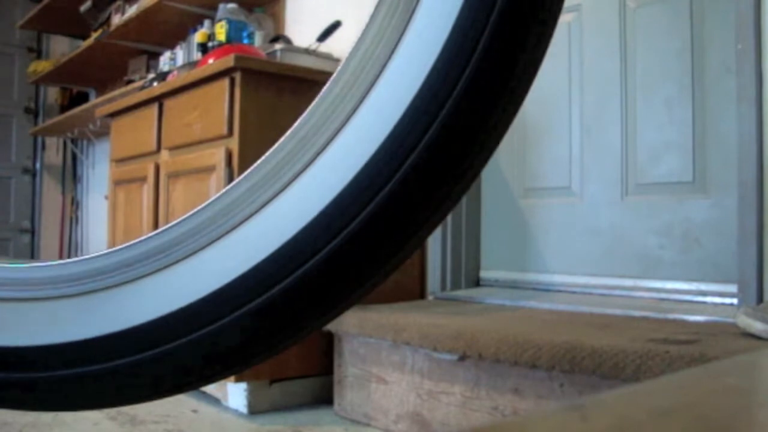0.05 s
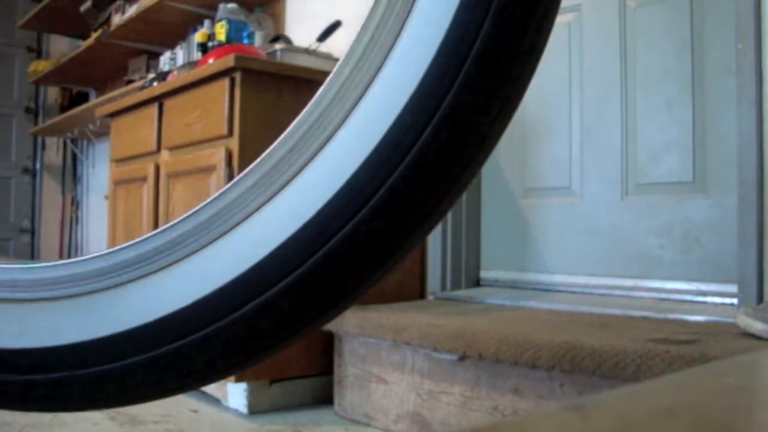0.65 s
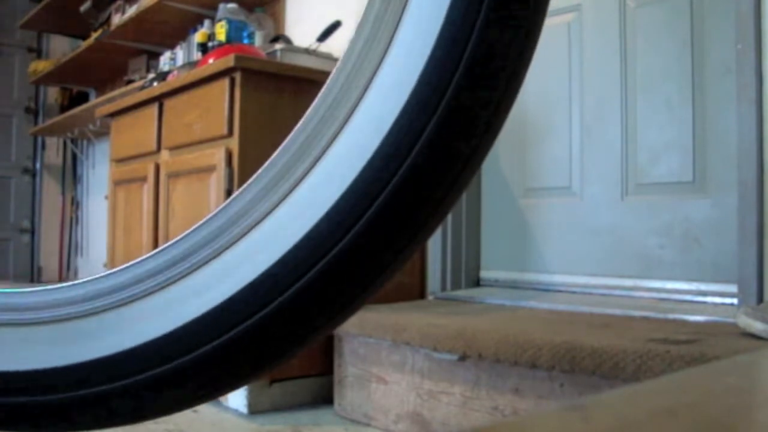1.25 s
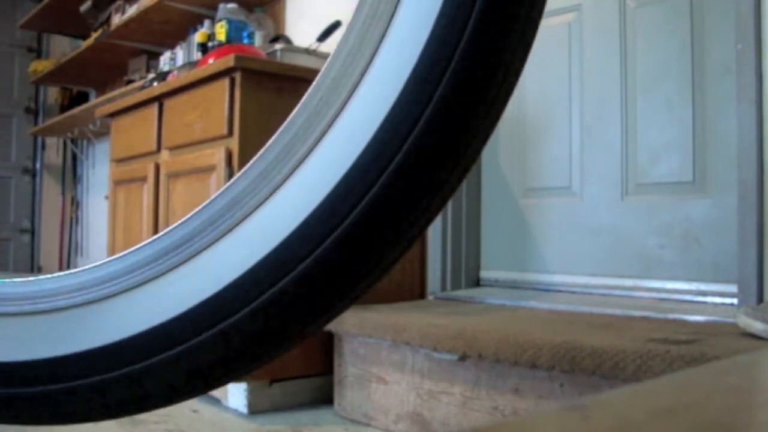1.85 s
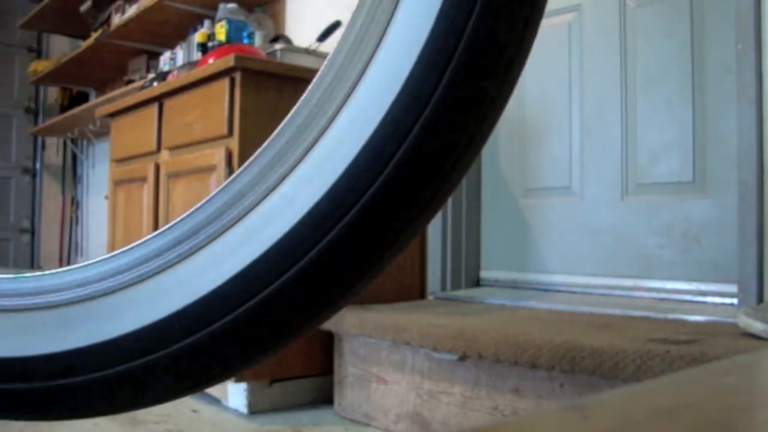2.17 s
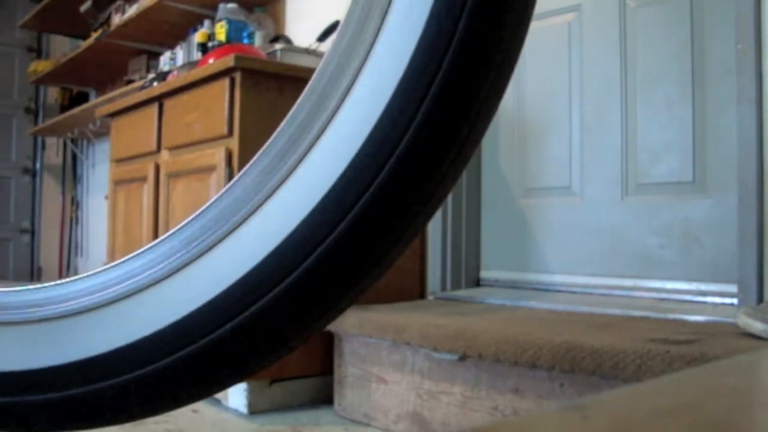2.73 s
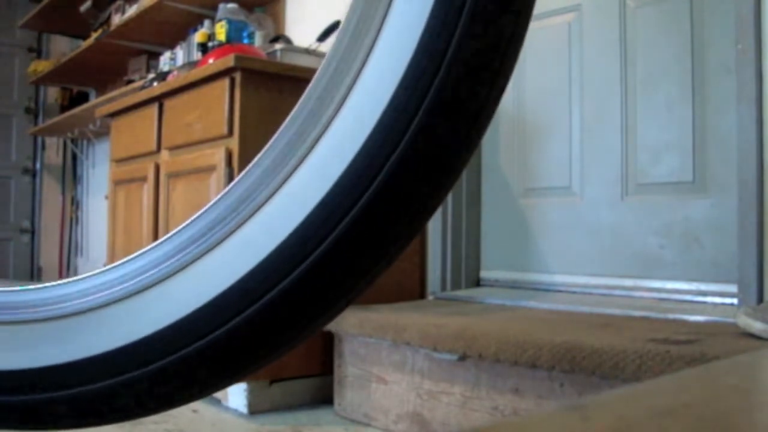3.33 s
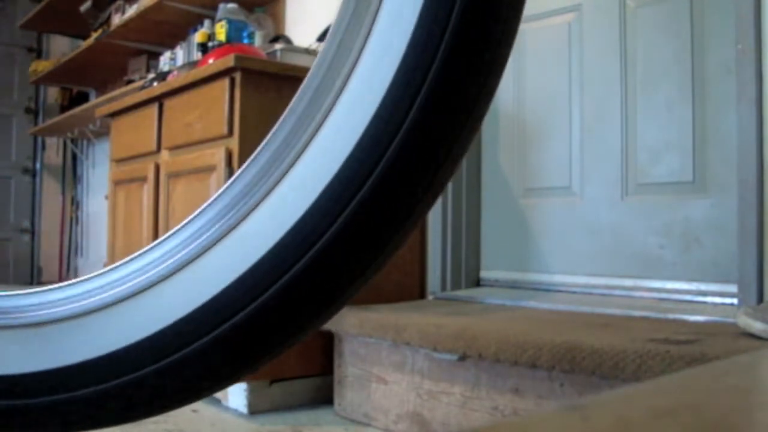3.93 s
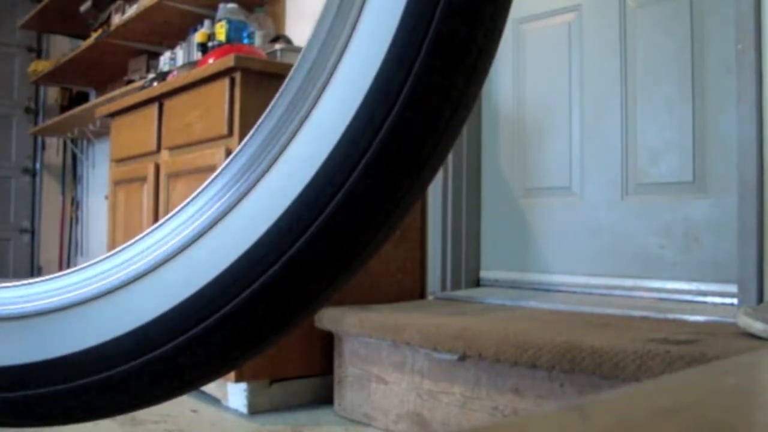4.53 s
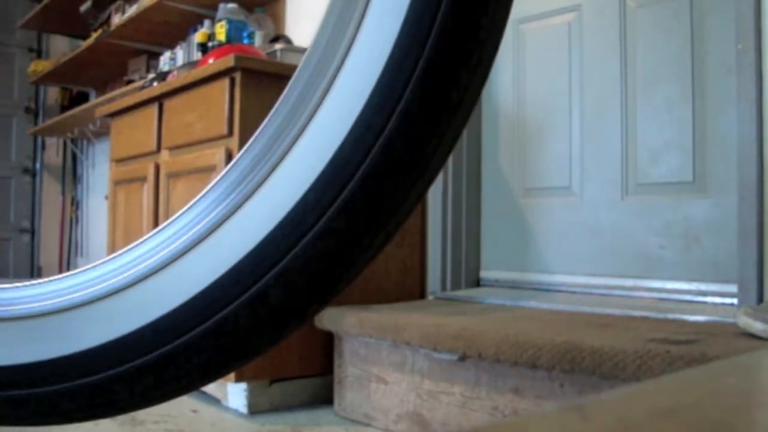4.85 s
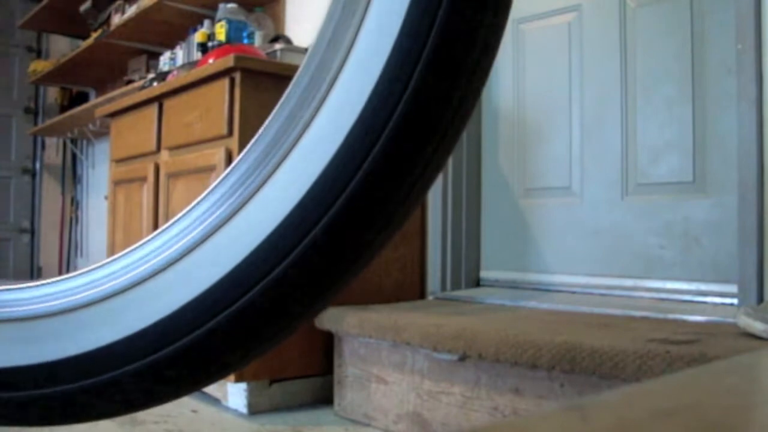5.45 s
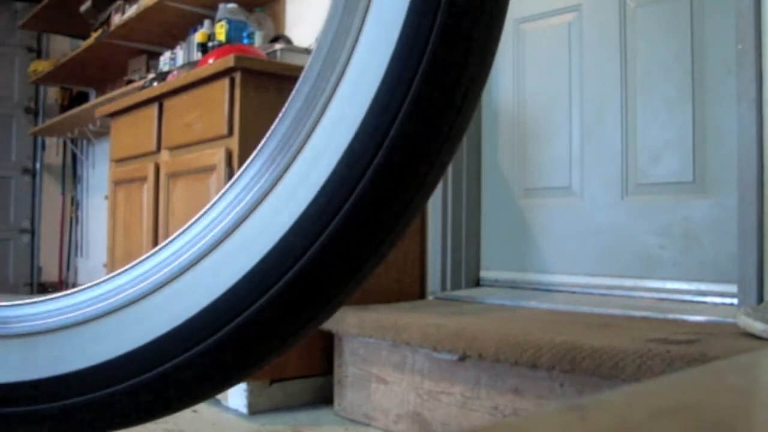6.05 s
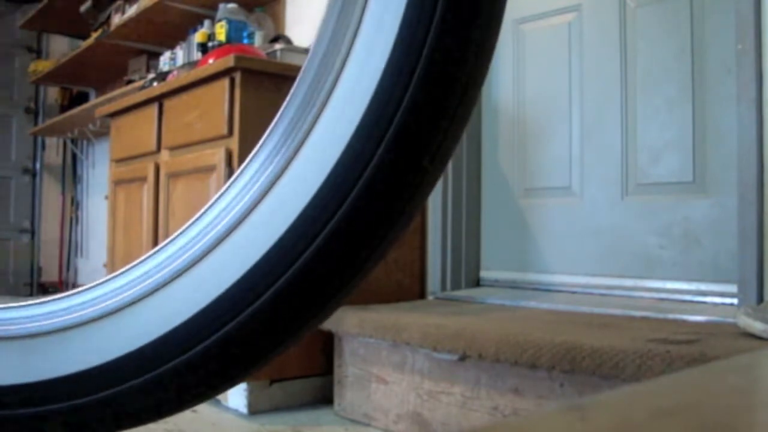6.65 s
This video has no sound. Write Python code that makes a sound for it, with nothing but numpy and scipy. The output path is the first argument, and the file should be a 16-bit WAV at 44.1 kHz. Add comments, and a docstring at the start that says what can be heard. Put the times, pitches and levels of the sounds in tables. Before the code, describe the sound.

From 0 seconds, a bicycle's rear wheel is already spinning freely close to the microphone. The ratchet in its hub makes tiny, sharp steel clicks, about fifty-five a second at first, so they run together into a high, bright buzz. Each click carries a thin metallic ring from the hub, spokes and rim, with faint high pings scattered through it. The clicks are slightly uneven, and the buzz throbs gently about twice a second as the wheel turns. From the first second or so onward, the wheel steadily loses speed: the click rate eases down, the buzz grows a little coarser and slightly softer, and the throb slows with it. The clicking continues unbroken to the end. The garage adds a light echo, about a second long, and a very faint, steady hush of room air lies underneath.

```python
"""A freewheeling bicycle wheel

A rear wheel spins freely in a garage and slowly loses speed, its ratchet buzzing.
Two steel pawls (small catches) scrape up each of 24 teeth and snap down, ringing the hub,
the spokes and the rim. The ringing parts turn past a near microphone, and the garage echoes."""
import sys
import numpy as np
from scipy import signal
from scipy.fft import rfft, irfft, next_fast_len
from scipy.io import wavfile

SR = 44100
rng = np.random.default_rng(int(sys.argv[2]) if len(sys.argv) > 2 else 0)


def log_audio(samples):
    """Write samples as a 16-bit WAV file to the path given in sys.argv[1]."""
    # one column per channel
    frames = np.atleast_2d(samples).T
    # limit to full scale, then quantise
    limited = np.clip(frames, -1, 1)
    pcm = np.round(limited * 32767).astype(np.int16)
    wavfile.write(sys.argv[1], SR, pcm)


N = 295029


def amp(db):
    """Turn decibels into a gain."""
    return 10 ** (np.asarray(db) / 20)


def coloured(x, spectrum):
    """Shape the tone of x with a curve through (pitch [Hz], level [dB]) points."""
    hz, db = np.transpose(spectrum)
    bins_hz = np.fft.rfftfreq(len(x), 1 / SR)
    curve_db = np.interp(np.log(bins_hz + 1), np.log(hz), db)
    return irfft(rfft(x) * amp(curve_db), len(x))


def noise(spectrum, size):
    """Noise with the given tone, at an average (rms) level of 1."""
    x = coloured(rng.standard_normal(next_fast_len(size)), spectrum)[:size]
    return x / np.std(x)


def pulses(times, sizes):
    """A row of sharp clicks, which may fall between samples."""
    at = times[:, None] * SR
    taps = np.floor(at).astype(int) + np.arange(-7, 9)
    shape = np.sinc(taps - at) * np.sinc((taps - at) / 8)
    inside = (taps >= 0) & (taps < N)
    return np.bincount(taps[inside], (sizes[:, None] * shape)[inside], N)


def ring(x, response):
    """Let every click in x set off the given ringing sound."""
    return signal.oaconvolve(x, response)[:N]


def tone(hz, peak_s, order=3):
    """One ringing tone that swells to its peak and dies away."""
    t = np.arange(SR // 10) / SR
    age = t / peak_s
    return (age * np.exp(1 - age)) ** order * np.sin(2 * np.pi * hz * t)


def dense_ring(spectrum, rise_s, fade_s):
    """Countless tones fading together, by 60 dB in fade_s; the deep bass is filtered out."""
    t = np.arange(SR // 2) / SR
    tail = noise(spectrum, size=len(t)) * (1 - np.exp(-t / rise_s)) * amp(-60 * t / fade_s)
    tail = signal.sosfilt(signal.butter(3, 140, "high", fs=SR, output="sos"), tail[t < fade_s])
    return tail / np.linalg.norm(tail)


def turning(blows, turn, spectrum, rise_s, fade_s, angles):
    """The ringing changes as the wheel turns: each angle's sound fades into the next."""
    out = np.zeros(N)
    for k in range(angles):
        away = np.abs((turn * angles - k + angles / 2) % angles - angles / 2)
        share = np.cos(np.minimum(away, 1) * np.pi / 2)
        out += ring(blows * share, dense_ring(spectrum, rise_s, fade_s))
    return out


def passing(blows, turn, tones, order):
    """Each tone swells once a turn, as its loudest part passes the microphone."""
    out = np.zeros(N)
    for hz, peak_s, db, swing_db, facing in tones:
        gain = amp(db + swing_db * np.cos(2 * np.pi * (turn - facing)))
        out += ring(blows * gain, tone(hz, peak_s, order))
    return out


# The hush of the room: (pitch [Hz], relative level [dB])
AIR_SPECTRUM = [(20, -0.5), (45, -34.5), (66, -9), (80, 7), (95, -3), (120, 3.5), (160, 0.5), (260, 7),
                (700, 8.5), (3000, 7), (10000, -21.5)]

def still_air():
    """The air in the garage makes a faint, steady hush."""
    return amp(-60) * noise(AIR_SPECTRUM, size=N)


# The tone of the echo: (pitch [Hz], relative level [dB])
ECHO_SPECTRUM = [(170, -34), (270, -20.5), (800, -16), (1650, -8.5), (2050, -1.5), (2650, 0), (3100, 4.5),
                 (3800, 6), (4400, 5), (4900, 7.5), (5800, -12.5), (6500, -30), (7700, -16), (10000, -50)]

def garage_echo(blows, turn):
    """The garage answers each click with a wash of echoes."""
    return amp(-15) * turning(blows, turn, ECHO_SPECTRUM, rise_s=0.00063, fade_s=1.0, angles=6)


# The rim's tones, with two steady tones of the garage near 2.9 kHz (2853 and 2930 Hz): # (pitch [Hz], time to
# peak [s], relative level [dB], swing each way [dB], swing angle [turns])
RIM_TONES = [(572, 0.0068, -43.5, 2.5, 0.3), (941, 0.018, -46.5, 1.5, 0.95), (1053, 0.0039, -43, 8.5, 0.9),
             (1253, 0.0056, -41.5, 2.5, 0.9), (1389, 0.0055, -29.5, 3, 0.51), (1973, 0.0089, -38, 13.5, 0),
             (2448, 0.014, -40.5, 9, 0.48), (2853, 0.011, -25.5, 2, 0.5), (2930, 0.058, -42.5, 10.5, 0.2),
             (3130, 0.011, -33, 8, 0.14), (3720, 0.0078, -40, 13, 1)]

def rim(blows, turn):
    """Blows travel through the spokes, so the rim's tones swell more slowly; two steady garage tones ring
    along."""
    return amp(-21) * passing(blows, turn, RIM_TONES, order=3)


# The ring of spokes and frame: (pitch [Hz], relative level [dB])
SPOKE_SPECTRUM = [(80, -55.5), (270, -29.5), (520, -31.5), (780, -30), (1200, -14.5), (1650, -26),
                  (2000, -13), (2650, -13.5), (3100, 6), (3550, 6), (4050, 7), (4400, -2.5), (5050, 5),
                  (5800, -1), (7000, -34.5)]

def spokes(blows, turn):
    """Spokes and frame ring with many tones at once."""
    return amp(-13) * turning(blows, turn, SPOKE_SPECTRUM, rise_s=0.0003, fade_s=0.084, angles=12)


# The flanges' tones:
# (pitch [Hz], time to peak [s], relative level [dB], swing each way [dB], swing angle [turns])
FLANGE_TONES = [(3453, 0.0019, 4, 2.5, 0.77), (3930, 0.00078, -2, -0.5, 0.1), (4854, 0.00096, 3, 0.5, 0.49)]

def flanges(blows, turn):
    """The flanges, the hub's collars that hold the spokes, ring right away."""
    return amp(-40.5) * passing(blows, turn, FLANGE_TONES, order=2)


# The ring of the hub's shell: (pitch [Hz], relative level [dB])
HUB_SPECTRUM = [(2500, -31.5), (4400, -12), (5000, -18), (6100, -72), (6750, 12.5), (7100, -18.5),
                (7450, 17.5), (7780, 16), (8150, -28), (8700, 14), (9200, -9), (10000, -2.5)]

def hub(snaps, turn):
    """Each snap makes the hub's shell ring, short and bright."""
    return amp(-9.5) * turning(snaps, turn, HUB_SPECTRUM, rise_s=0.0015, fade_s=0.011, angles=12)


# Faint high pings: (pitch [Hz], relative level [dB])
PING_TONES = [(7350, 9.5), (7800, 7), (8350, 0), (8850, -8), (9500, -6)]

def pings(times, sizes, chance=0.21, earliest_s=0.001, spread_s=0.0082):
    """Now and then a high tone flares briefly after a click."""
    out = np.zeros(N)
    for hz, db in PING_TONES:
        luck, late = rng.random((len(times), 2)).T
        strength = np.sqrt(np.maximum(1 - luck / chance, 0))
        starts = pulses(times + earliest_s + spread_s * late, sizes * strength)
        out += amp(db) * ring(starts, tone(hz, peak_s=0.0031, order=4))
    return amp(-35.5) * out


def scrape(times, sizes, length_s=0.002):
    """Just before it falls, the pawl grates over the tip of the tooth."""
    t = np.arange(N) / SR
    coming = np.minimum(np.searchsorted(times, t), len(times) - 1)
    swell = np.exp(-((times[coming] - t) / length_s) ** 4)
    return amp(-22.5) * sizes[coming] * swell * rng.standard_normal(N)


def pawl_strokes(times, sizes, lag_s=0.0011, bounce_s=0.0022, mean_loss_db=5.2, count=3):
    """At each tooth one pawl snaps down, the other follows, and weaker bounces come after."""
    luck = rng.random((len(times), count, 2))
    strokes = pulses(times, sizes)
    for k in range(count):
        times = times + (bounce_s if k else lag_s) * (0.5 + luck[:, k, 0])
        sizes = sizes * amp(-2 * mean_loss_db * luck[:, k, 1])
        strokes += pulses(times, sizes)
    return strokes


# A pawl's own tones: (pitch [Hz], time to peak [s], relative level [dB])
PAWL_TONES = [(7655, 0.00057, -1), (9300, 0.00063, -7), (7190, 0.00021, 4), (10900, 0.00012, -22.5)]

def pawls(snaps):
    """The small steel pawls ring with a very short, high tick."""
    tick = sum(amp(db) * tone(hz, peak_s) for hz, peak_s, db in PAWL_TONES)
    return amp(-22.5) * ring(snaps, tick)


TOOTH_COUNT = 24
# Teeth that stand out: (tooth [number], change in snap [dB], change in blow to the wheel [dB])
UNEVEN_TEETH = [(0, -2.8, 1.8), (5, -2, -1.8), (6, 2.3, -2.3), (9, .3, 1.7), (11, -1.8, -1.7),
                (15, 1.7, 2.8), (18, .5, 4.2)]

def tooth_wear_db(usual_wear_db=1):
    """Every tooth is a little worn and a few stand out, so each has its own snap and blow."""
    wear = usual_wear_db * rng.standard_normal((TOOTH_COUNT, 2))
    for number, snap_db, blow_db in UNEVEN_TEETH:
        wear[number] = snap_db, blow_db
    return wear


def force_db(times, turn):
    """The pawls fall softer over time, and unevenly: the ratchet is off centre and slightly oval."""
    fading = -2.33 - 0.1846 * times
    swing_db = -0.3 + 0.22 * times  # passes through zero, then grows as the wheel slows
    off_centre = swing_db * np.cos(2 * np.pi * (turn - 0.5))
    oval = 0.5 * np.cos(2 * np.pi * 2 * (turn - 0.23))
    return fading + off_centre + oval


def coasting(t, start_teeth_per_s=55.619, slowing_per_s=2.2486, easing_s=36.9):
    """Teeth passed per second: bearings and air brake the wheel, a little less as it slows."""
    return start_teeth_per_s - slowing_per_s * easing_s * (1 - np.exp(-t / easing_s))


def freewheel():
    """The pawls drop off tooth after tooth, ringing the whole wheel and filling the garage."""
    t = np.arange(N) / SR
    speed = coasting(t)
    teeth_passed = np.cumsum(speed) / SR - 0.27  # starts just short of the first tip
    turn = teeth_passed / TOOTH_COUNT
    tooth = np.arange(int(teeth_passed[-1]) + 1)
    time_jitter, force_jitter, squareness = rng.standard_normal((len(tooth), 3)).T
    times = np.interp(tooth, teeth_passed, t) + 0.00004 * time_jitter
    sizes = amp(force_db(times, tooth / TOOTH_COUNT) + 0.5 * force_jitter)

    # the light hub feels every bounce; the heavy wheel follows mostly the first blow
    blows = pulses(times, sizes)
    rattle = pawl_strokes(times, sizes)
    shakes = blows + amp(-0.5) * rattle

    # the same teeth come round every turn, so the buzz throbs about twice a second
    nearest = np.clip(np.round(teeth_passed).astype(int), 0, tooth[-1])
    snap_gain, blow_gain = amp(tooth_wear_db())[nearest % TOOTH_COUNT].T
    snap_gain *= amp(1.8 * squareness[nearest])  # a square landing is brighter than a glancing one
    snap_gain *= (speed[0] / speed) ** 0.43  # slower teeth let the pawls fall their full depth
    evened = np.sqrt(blow_gain) * shakes  # the many spokes even out the teeth

    sound = pawls(snap_gain * (rattle + scrape(times, sizes)))
    sound += hub(snap_gain * rattle, turn) + flanges(blow_gain * shakes, turn)
    sound += spokes(evened, turn) + rim(blows, turn)
    return sound + garage_echo(evened, turn) + pings(times, sizes)


def scene():
    """The spinning wheel over the faint hush of the garage."""
    return (freewheel() + still_air())[None]


# The highest treble is cut away: (pitch [Hz], level [dB])
TREBLE_CUT = [(20, 0), (10010, 0), (10160, -16), (10500, -26), (11300, -44), (12500, -70)]

def record(dry):
    """The sound falls away steeply above about 10 kHz."""
    padded = np.pad(dry[0], (0, next_fast_len(N + SR // 10) - N))
    return coloured(padded, TREBLE_CUT)[None, :N]


dry = scene()
out = record(dry)
log_audio(out)
```